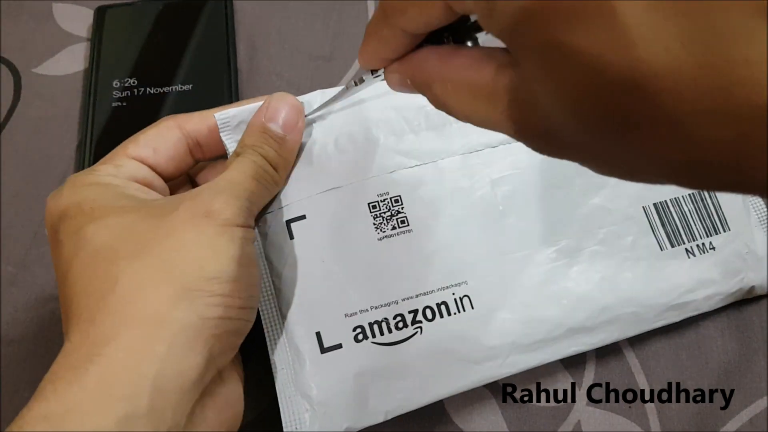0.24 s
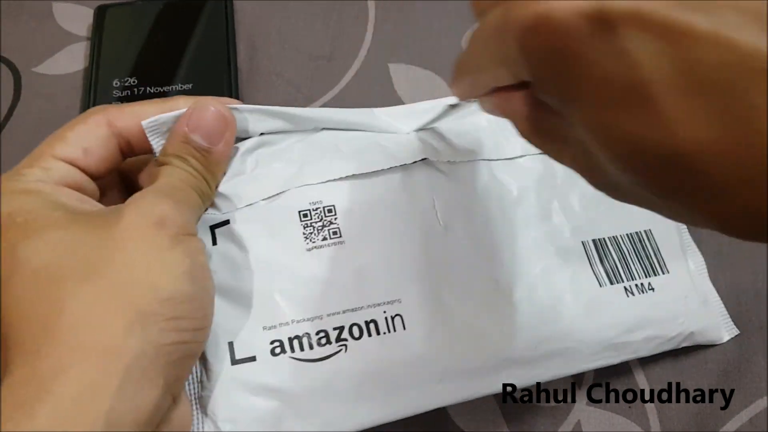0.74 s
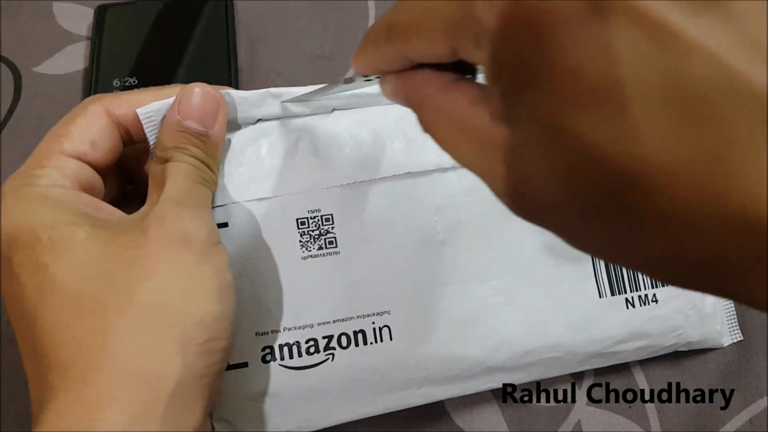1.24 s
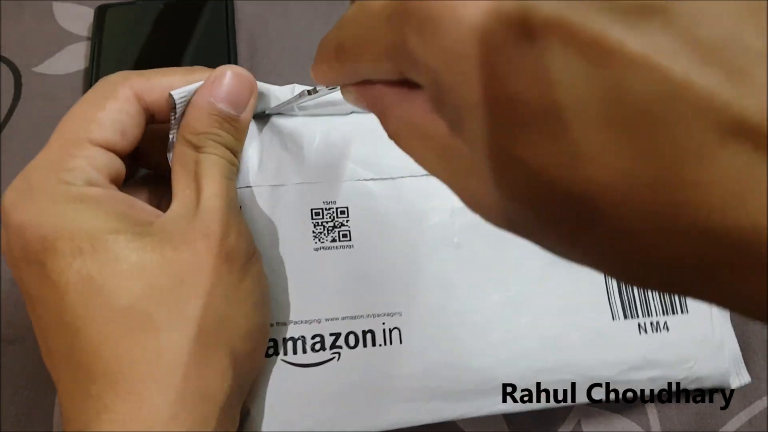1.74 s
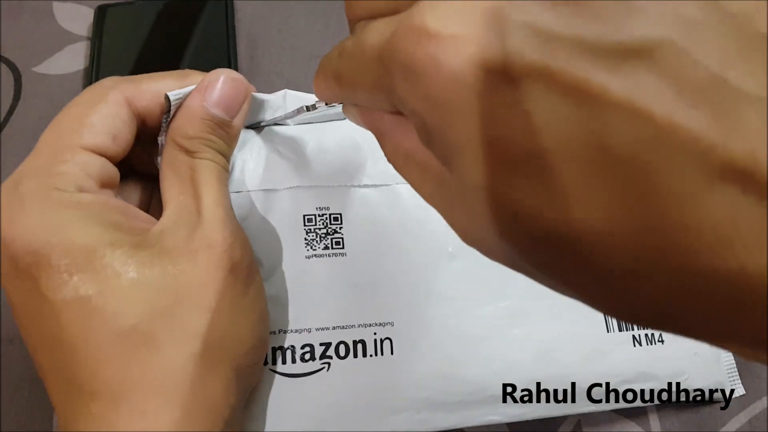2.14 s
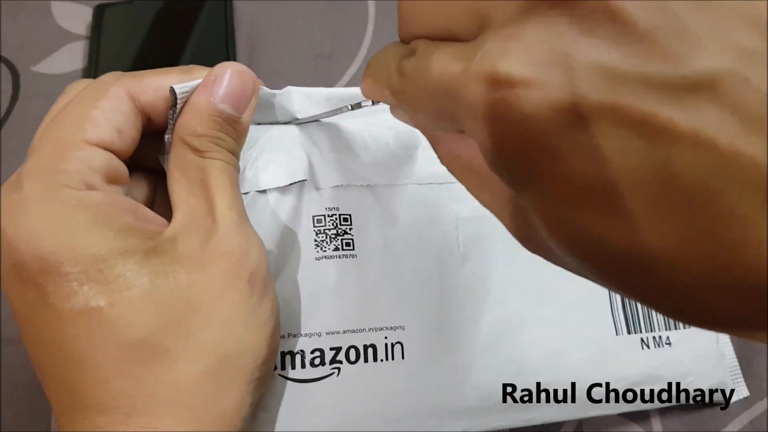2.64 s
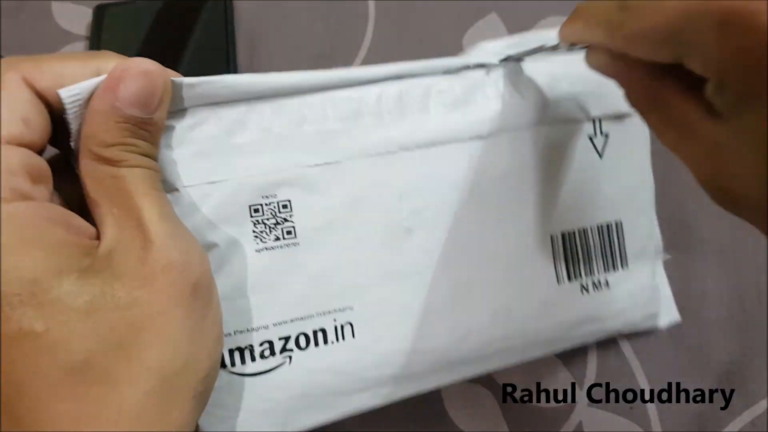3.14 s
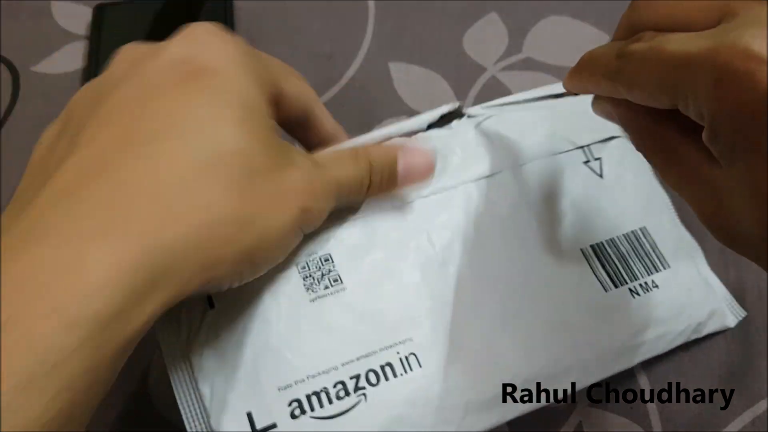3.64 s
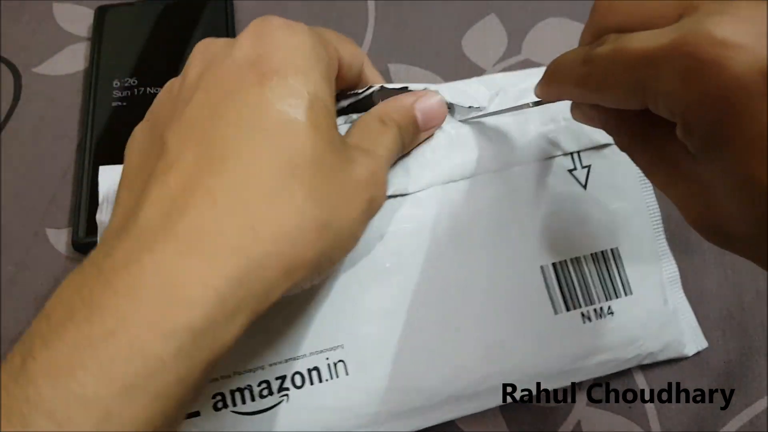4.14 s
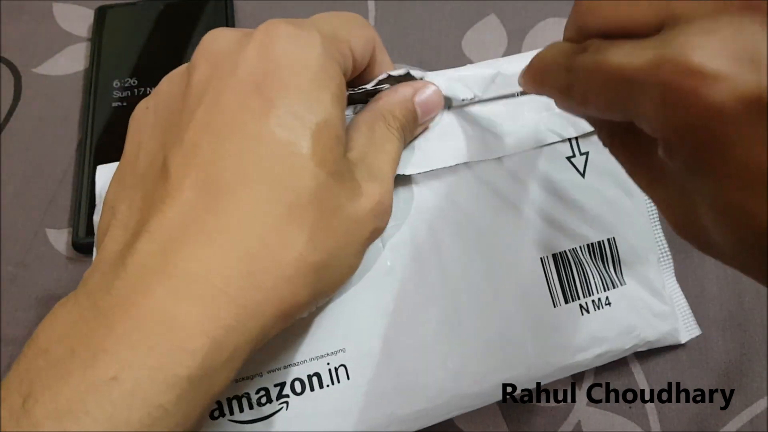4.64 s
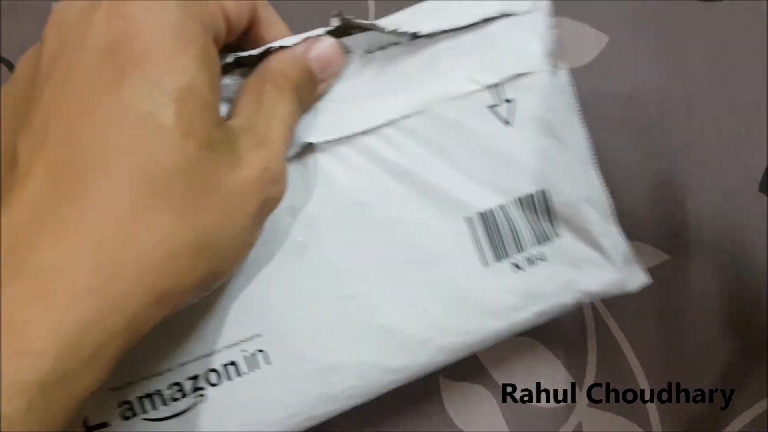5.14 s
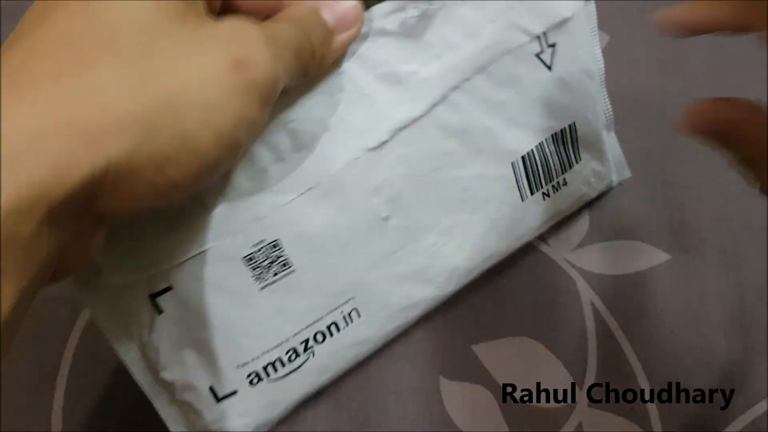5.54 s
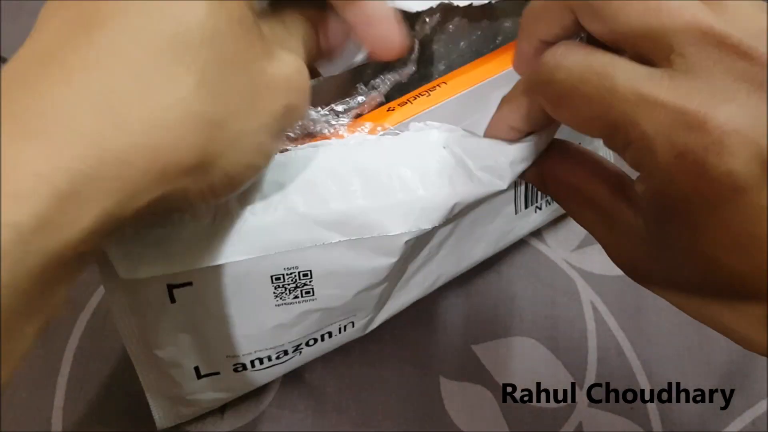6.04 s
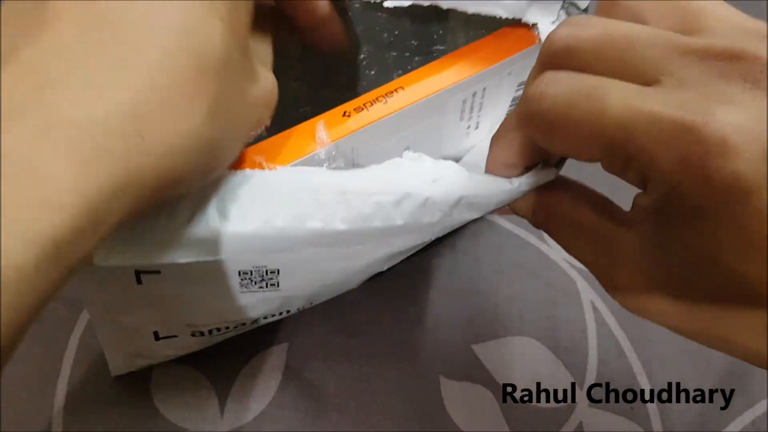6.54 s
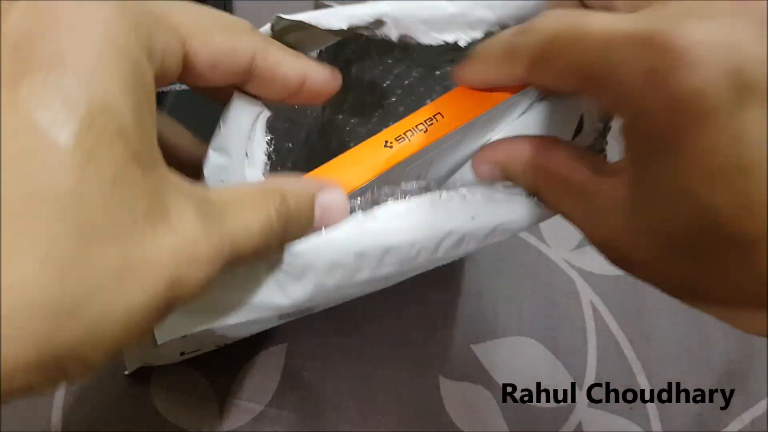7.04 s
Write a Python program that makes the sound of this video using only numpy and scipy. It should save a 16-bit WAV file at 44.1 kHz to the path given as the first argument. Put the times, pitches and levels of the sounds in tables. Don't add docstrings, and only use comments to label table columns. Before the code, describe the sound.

Very close to the microphone in a small furnished room, fingers rustle a padded plastic mailer while a knife works in with small dry snaps and bright ticks. A sudden loud cluster of cracks marks a long cut, followed by quieter regripping. A second quick, hollow rip bursts out, then the opened pouch crinkles and pops with soft low bumps on bedding. A faint machine hums through the wall.

```python
import sys
import numpy as np
from scipy import signal
from scipy.fft import rfft, irfft, next_fast_len
from scipy.io import wavfile
from scipy.ndimage import uniform_filter1d, map_coordinates

SR = 44100
rng = np.random.default_rng(int(sys.argv[2]) if len(sys.argv) > 2 else 0)


def decibels_to_gain(level_db):
    exponent = np.asarray(level_db, float) / 20
    return 10 ** exponent


def int16_out(signal):
    q = np.round(np.clip(np.atleast_2d(signal).T, -1, 1) * 32767)
    wavfile.write(sys.argv[1], SR, q.astype(np.int16))


N = 321930
LEAD = 128
PORT_LAG = 5
OPEN_S = 5.2


def unit(x):
    return x / np.sqrt(np.mean(x ** 2) + 1e-20)


def along(points, hz):
    point_hz, value = np.transpose(points)
    return np.interp(np.log(hz + 1), np.log(point_hz + 1), value)


def curves(rows):
    s, *columns = np.transpose(rows)
    return [np.interp(np.arange(N) / SR, s, column) for column in columns]


def wobble(rate):
    knots = rng.standard_normal(int(N * rate / SR) + 4)
    return map_coordinates(knots, [np.arange(N) * rate / SR])


def filtered(x, response):
    size = next_fast_len(x.shape[-1] + 8192)
    spectrum = rfft(x, size) * response(np.fft.rfftfreq(size, 1 / SR))
    return irfft(spectrum, size)[..., :x.shape[-1]]


# (frequency [Hz], likeness [-1 to 1])
LIKENESS = [(100, 0.94), (700, 0.75), (2000, 0.56), (6000, 0.029), (14000, 0.034)]


def rush(spectrum):
    def mid_side(hz):
        turn = np.arccos(np.clip(along(LIKENESS, hz), -1, 1)) / 2
        return decibels_to_gain(along(spectrum, hz)) * [np.cos(turn), np.sin(turn)]

    mid, side = filtered(rng.standard_normal((2, N)), mid_side)
    return unit(np.array([mid + side, mid - side]))


def place(seconds, shapes, lag):
    at = np.round(seconds * SR).astype(int)[:, None] + np.arange(shapes.shape[2])
    ports = []
    for shape, late in zip(shapes, (0, lag)):
        track = np.bincount((at + late).ravel(), shape.ravel(), N + SR)
        ports.append(track[LEAD:N + LEAD])
    return np.array(ports)


def burst(spectrum, focus_hz, focus_db, rise, t60, core, unlike, size):
    t, hz = (np.arange(size) - LEAD) / SR, np.fft.rfftfreq(size, 1 / SR)
    draw = rng.standard_normal((len(focus_hz), 3 * size + 1))
    common, left, right = np.moveaxis(draw[:, 1:].reshape(-1, 3, size), 1, 0)
    life = np.where(t < 0, -rise, t60) * decibels_to_gain(1.2 * draw[:, :1])
    creep = .14 * decibels_to_gain(-15 * t / life)
    envelope = decibels_to_gain(-60 * t / life) + creep
    slip = (common + unlike * np.array([left, right])) * envelope
    slip[..., LEAD] += core
    focus = np.exp(-(np.log((hz + 1) / focus_hz) / 0.37) ** 2)
    colour_db = along(spectrum, hz) + focus_db * focus
    rows = irfft(rfft(slip) * decibels_to_gain(colour_db), size)
    return rows / np.abs(rows).max(axis=(0, 2), keepdims=True)


# (pitch [Hz], start [s], loudest [s], stop [s], loudest level [dB])
MACHINE_RUNS = [
    (91.5, -.3, .1, .55, -55),
    (91.5, 1.54, 1.6, 1.95, -52),
    (91.5, 1.98, 2.25, 2.5, -47),
    (91.5, 3.55, 4.7, 4.9, -53),
    (91.5, 5.1, 5.9, 6.6, -58),
    (33, -.1, .25, .6, -55),
    (33, 3.85, 4.1, 4.8, -59.5),
    (169, 5.08, 5.3, 5.56, -53),
    (169, 5.93, 6.02, 6.35, -54),
]


def hum(hz, level_db, drift):
    turns = np.cumsum(hz * (1 + drift * wobble(3.59))) / SR
    return np.sqrt(2) * decibels_to_gain(level_db) * np.sin(2 * np.pi * turns)


def machine():
    fade_s, drift_hz = .16, 1.3
    t = np.arange(N) / SR
    tones = np.zeros(N)
    for hz in sorted({row[0] for row in MACHINE_RUNS}):
        levels = []
        for pitch, start, loudest, stop, db in MACHINE_RUNS:
            if pitch == hz:
                times = [start - fade_s, start, loudest, stop, stop + fade_s]
                levels.append(db + np.interp(t, times, [-25, -5, 0, -5, -25]))
        tones += hum(hz, np.max(levels, axis=0) + 1.25 * wobble(11), drift_hz / hz)
    return np.array([tones, np.roll(tones, 5 * PORT_LAG)]) * decibels_to_gain([[-.7], [.7]])


# (time [s], hold [s], rustle level [dB], fizz rel. to rustle [dB])
GRIPS = [(0, 0.052, -58.5, -4.5), (0.228, 0.035, -60.5, -16), (0.38, 0.08, -60, -8.5),
         (0.667, 0.0079, -46, 5.5), (0.76, 0.042, -55, -2), (0.924, 0.033, -51, -3),
         (1.3, 0.015, -60.5, -9), (1.388, 0.2, -55, -3.5), (1.623, 0.14, -62.5, 5), (1.817, 0.24, -62, -1),
         (2.108, 0.38, -68.5, -3.5), (2.518, 0.17, -58.5, -6), (3.18, 0.23, -62.5, 3.5),
         (3.737, 0.043, -54, -4), (3.845, 0.23, -55, -3.5), (4.152, 0.095, -57, 0), (4.322, 0.14, -61.5, 1),
         (4.553, 0.0081, -59.5, 0), (4.713, 0.1, -57.5, -0.5)]
# (time [s], hold [s], rustle level [dB], fizz rel. to rustle [dB])
STROKES = [
    (2.655, 0.0091, -59, 3),
    (2.8, 0.015, -29, 0),
    (2.999, 0.06, -37, 6),
    (4.861, .01, -37, 1),
    (4.905, 0.017, -29, 7.5),
]
# (time [s], hold [s], rustle level [dB], fizz rel. to rustle [dB])
PULLS = [(5.216, 0.19, -51, -4.5), (5.45, 0.17, -54.5, -6.5), (5.707, 0.099, -54, -4),
         (5.86, 0.0088, -48, 4), (5.982, 0.0085, -49.5, 11), (6.148, 0.014, -55, 7),
         (6.328, 0.071, -49.5, 4), (6.508, 0.011, -45, 9), (6.697, 0.019, -54.5, 10),
         (6.852, 0.17, -60.5, 5), (6.996, 0.056, -57.5, 5), (7.077, 0.16, -63.5, 13.5),
         (7.262, 0.015, -56, 7)]


def effort():
    rest_rustle_db, rest_fizz_db = -67.5, -71
    rustle_fall, fizz_fall = 123, 173
    s, hold, db, fizz_db = np.transpose([*STROKES, *GRIPS, *PULLS])[:, :, None]
    blade = np.arange(len(s))[:, None] < len(STROKES)
    rise = np.where(blade, 910, 264)
    t = np.arange(0, N + 64, 64) / SR
    before = np.maximum(s - t, 0)
    after = np.maximum(t - s - hold, 0) * np.where(blade, 1.07, 1)
    rustle = decibels_to_gain(2 * (db - rise * before - rustle_fall * after)).sum(axis=0)
    fizz = decibels_to_gain(2 * (db + fizz_db - rise * before - fizz_fall * after)).sum(axis=0)
    rustle_db = 10 * np.log10(decibels_to_gain(2 * rest_rustle_db) + rustle)
    total_fizz_db = 10 * np.log10(decibels_to_gain(2 * rest_fizz_db) + fizz)
    return curves(np.transpose([t, rustle_db, total_fizz_db]))


# (frequency [Hz], level [dB per Hz])
RUMBLE = [(12, -30), (20, -20), (43, -5.5), (103, 1.5), (173, -0.5), (443, -14.5), (500, -9), (650, -37),
          (1100, -120)]


def bedding():
    lifted = np.arange(N) / SR > OPEN_S
    pressing_db = uniform_filter1d(effort()[0], int(0.028 * SR)) + 57
    level_db = -58 + 3 * lifted + 0.36 * pressing_db + 2.62 * wobble(25)
    return decibels_to_gain(level_db) * rush(RUMBLE)


def crinkle(level_db, spectrum, low_hz, high_hz, t60, spread_db, count):
    draw = rng.random((count, 4))
    size = decibels_to_gain(-spread_db * np.log(draw[:, 1:2] + 0.066))
    sides = decibels_to_gain(12.0 * (draw[:, 2:3] - .5) * np.array([1, -1])[:, None, None])
    pitch_hz = low_hz * (high_hz / low_hz) ** draw[:, 3:]
    shapes = burst(spectrum, pitch_hz, 9.2, rise=0.014, t60=t60, core=4.9, unlike=1.0, size=384)
    grains = place(draw[:, 0] * N / SR, sides * size * shapes, PORT_LAG)
    return decibels_to_gain(level_db) * unit(grains)


# (frequency [Hz], level [dB per Hz])
RUSTLE = [(150, -39), (260, 4.5), (450, -7), (760, -0.5), (1050, -7), (1400, -7), (1900, -6.5),
          (2500, -7.5), (3800, -14), (6000, -23.5), (9000, -44)]
# (frequency [Hz], level [dB per Hz])
FIZZ = [(1500, -6.5), (3500, -2.5), (7000, -5), (15000, -5), (17000, -11)]


def mouth(x):
    width_hz = 220

    def resonances(hz):
        return sum(1j * hz * width_hz / (centre ** 2 - hz ** 2 + 1j * hz * width_hz)
                   for centre in (1400, 2350))

    return decibels_to_gain(2) * filtered(x, resonances)


def handling():
    rustle_db, fizz_db = effort()
    slit = np.arange(N) > OPEN_S * SR
    tremor = 1.5 * wobble(60)
    rustle = decibels_to_gain(np.minimum(rustle_db - 6 + 3 * slit, -47) + tremor) * rush(RUSTLE)
    fizz = decibels_to_gain(np.minimum(fizz_db - 1.5, -49) + tremor) * rush(FIZZ)
    dull_db = np.minimum(rustle_db - 4 * slit, -41) + tremor
    dull = crinkle(dull_db, RUSTLE, low_hz=660, high_hz=4200, t60=0.011, spread_db=3.8, count=3000)
    bright_db = fizz_db - 9 - 4 * slit
    bright = crinkle(bright_db, FIZZ, low_hz=3870, high_hz=14200, t60=0.009, spread_db=2.5, count=2200)
    low = rustle + dull
    low = low + mouth(low) * slit
    return decibels_to_gain([[.6], [-.6]]) * low + decibels_to_gain([[1.5], [-1.5]]) * (fizz + bright)


# (time [s], left over right level [dB])
BLADE_PAN = [(0, 4), (2.8, 4.5), (3.4, 5), (3.7, 1.5), (4.5, 4), (4.6, 4.5), (5.3, 3.5), (7.3, 3.5)]


def slips(rows, spectrum, level_db, focus_db, t60):
    s, db, hz = np.transpose(rows)[:, :, None]
    pan_db = np.interp(s, *np.transpose(BLADE_PAN))
    sides_db = np.array([pan_db, -pan_db]) / 2
    shapes = burst(spectrum, hz, focus_db, rise=.003, t60=t60, core=4, unlike=.6, size=512)
    give_s = .0014
    return place(s[:, 0] + give_s, decibels_to_gain(db + level_db + sides_db) * shapes, PORT_LAG)


# (frequency [Hz], level [dB per Hz])
POUCH_WALL = [(300, -42), (700, -3.5), (3000, -7), (6000, -7.5), (10000, -21)]
# (time [s], peak level [dB], pitch [Hz])
DIMPLES = [(0.009, -38.5, 1170), (0.027, -39, 1480), (0.04, -44, 1240), (0.387, -37, 1010),
           (0.424, -45, 1120), (0.651, -32, 1300), (0.664, -25, 1070), (0.686, -31, 1260),
           (0.698, -36, 1020), (0.73, -29, 1470), (0.783, -38, 802), (0.846, -45, 802), (0.858, -43, 829),
           (0.898, -37, 805), (0.914, -41, 816), (0.924, -35, 1750), (1.285, -39, 1090), (1.366, -40, 802),
           (1.399, -39.5, 851), (1.471, -50, 1720), (1.492, -41, 1840), (1.701, -37, 845),
           (1.729, -35.5, 860), (1.81, -43, 1950), (1.837, -38.5, 2050), (1.865, -40, 1100),
           (1.955, -39.5, 1010), (2.006, -45.5, 1140), (2.045, -58, 826), (2.296, -44.5, 802),
           (2.317, -44.5, 1330), (2.614, -41.5, 821), (3.699, -60, 810), (3.758, -39, 1180),
           (3.89, -34, 1300), (4.069, -45, 816), (4.139, -38, 848), (4.267, -38, 1880), (4.339, -39, 1750),
           (4.356, -39, 1910), (4.374, -37, 1830), (4.607, -48, 821), (4.918, -29, 1200), (4.924, -17, 894),
           (5.284, -40, 1430), (5.619, -52, 1870), (5.674, -39, 1320), (5.707, -42, 2330),
           (5.784, -29.5, 2480), (5.874, -27, 1820), (5.956, -26, 1890), (5.999, -44, 1410),
           (6.04, -32.5, 1330), (6.242, -39, 1350), (6.361, -33, 1190), (6.636, -36.5, 802),
           (6.777, -37.5, 1490), (6.853, -40.5, 1310), (6.975, -38, 1730), (7.019, -35, 888)]


def dimples():
    return slips(DIMPLES, POUCH_WALL, 0.39, 12.0, t60=0.014)


# (time [s], peak level [dB], pitch [Hz])
TICKS = [(0.0144, -52, 7380), (0.0463, -38, 11000), (0.4015, -43, 9790), (0.4194, -46, 5320),
         (0.4883, -46, 9130), (0.5072, -48, 9250), (0.5756, -45, 6570), (0.5985, -29.5, 8420),
         (0.699, -37, 5010), (0.8274, -49, 9300), (0.8515, -37, 5090), (0.9822, -31, 13700),
         (0.9994, -38, 6450), (1.0326, -38, 5130), (1.4925, -37, 5690), (1.515, -34, 7970),
         (1.5894, -33, 8550), (1.595, -34, 8590), (1.6726, -37, 5460), (1.7404, -43, 6070),
         (2.1291, -45, 8840), (2.1675, -51, 11500), (2.1804, -48, 8910), (2.1874, -44, 10500),
         (2.2518, -41.5, 5330), (2.3526, -53, 5340), (2.3735, -45, 9070), (2.429, -35, 7100),
         (2.5186, -28, 9000), (2.637, -26, 8730), (2.8265, -3.5, 13100), (3.8072, -39, 6220),
         (4.037, -40, 5020), (4.0602, -38, 6240), (4.182, -39, 11000), (4.233, -36, 11700),
         (4.3301, -40, 9420), (4.5276, -51, 6740), (4.5946, -31, 9180), (4.9436, -12, 5530),
         (5.1774, -41, 5630), (5.199, -42, 8300), (5.217, -37, 8110), (5.3443, -36, 11000),
         (5.3574, -35, 7570), (5.3864, -38, 12000), (5.5478, -39, 9120), (5.7843, -38, 5530),
         (5.9275, -26, 5350), (6.0004, -30, 8650), (6.013, -31, 8930), (6.0407, -45, 6710),
         (6.0681, -33, 11000), (6.1489, -36, 12700), (6.1784, -26, 5370), (6.3698, -24, 5510),
         (6.5061, -39, 8300), (6.5514, -33, 7250), (6.5894, -34, 6000), (6.6837, -30, 10400)]


def ticks():
    return slips(TICKS, FIZZ, -0.68, 9.5, t60=0.007)


# (time [s], peak level [dB], pitch [Hz])
CREASES = [(0.055, -40, 1880), (0.0644, -44, 1750), (0.632, -37, 1710), (0.7174, -41, 1390),
           (0.944, -38, 1840), (0.9614, -42, 1640), (1.3987, -38, 2360), (1.4341, -38, 1870),
           (1.4711, -41, 1790), (1.5304, -38, 1820), (3.3408, -49, 1820), (3.3667, -39.5, 2420),
           (3.6217, -44.5, 1230), (3.7844, -35, 1350), (3.9155, -39, 1270), (5.2244, -34, 1270),
           (5.2994, -44, 1400), (5.393, -33, 1300), (5.8894, -33, 2280), (5.9147, -28.5, 2160),
           (6.025, -46, 2310), (6.5245, -29, 1270), (6.552, -33, 1810), (6.7265, -38, 3960),
           (6.9814, -40, 1730), (7.0784, -45, 1720), (7.1806, -38, 4310), (7.207, -35, 1840),
           (7.2646, -34, 1360), (7.2784, -34, 1820)]


def creases():
    return slips(CREASES, POUCH_WALL, -2.0, 18, t60=0.017)


# (frequency [Hz], level [dB], decay [cycles])
POUCH_MODES = [(259, -1, 4.6), (380, -8.5, 10.5), (588, -0.5, 9.5), (735, 8, 10.9), (1084, -0.5, 10)]


def pouch_ring(count, scatter, spread_db, size):
    t = np.maximum(np.arange(size) - LEAD + 20, 0) / SR
    mode_hz, db, cycles = np.transpose(POUCH_MODES)[:, :, None]
    draw = rng.standard_normal((count, len(POUCH_MODES), 3))
    hz = mode_hz * np.exp(scatter * draw[..., :1])
    level_db = db + spread_db * draw[..., 1:2] - 60 * t * hz / cycles
    modes = decibels_to_gain(level_db) * np.sin(2 * np.pi * hz * t)
    rows = modes.sum(axis=1) * (1 - np.exp(-t / 0.00039))
    return rows / np.abs(rows).max(axis=1, keepdims=True)


# (time [s], crack peak level [dB], pouch rel. to crack [dB], fizz rel. to crack [dB])
PRYING = [(0.0719, -36.5, -17, -21), (0.2103, -19.5, -2, -13), (0.3684, -39.5, -9, -5),
          (0.4651, -30, -18, -24), (0.5536, -39, -31, 10.5), (0.6046, -36, -5, -5), (0.6297, -32.5, -4, -6),
          (0.6593, -32.5, 0, 1), (0.6712, -24, -11, -30), (0.7268, -26.5, -20, 0.5),
          (0.7445, -27.5, -8, -6.5), (0.7761, -32.5, -25, -2.5), (0.871, -35.5, -14, -5),
          (1.0132, -45, -19, 9), (1.0867, -39, -10, -6.5), (1.3498, -40, -13, 2), (1.4356, -33.5, -8, -5.5),
          (1.5446, -37.5, 7.5, -6), (1.5504, -30.5, -14, -16), (1.5829, -32.5, -1.5, -10),
          (1.6629, -32, -4, -13), (1.7176, -32.5, -10, -7.5), (1.7963, -42, -18, -1.5),
          (1.883, -35, -9, -10), (2.0953, -40.5, -15, -10), (2.3829, -38, -22, -13),
          (2.4158, -30.5, -17, 6.5), (2.4694, -38, -14, -1), (2.4912, -32.5, -15, 4), (2.5225, -27, -12, 0)]
CUT = [(2.6422, -32, -9, -7), (2.6443, -23.5, -2, -16), (2.6592, -27, -6, -8), (2.662, -20.5, -3.5, 4),
       (2.684, -37, -20, 4), (2.7089, -25, -12, -3), (2.7422, -33, -5, 2), (2.775, -36, 0, 0),
       (2.786, -18, -4, -13), (2.788, -23, -1, 6), (2.7917, -19.5, -6, 2.5), (2.794, -20.5, -2, -1),
       (2.801, -19.5, -12, 6), (2.8146, -17, -8, -5), (2.8193, -16, 1.5, -5), (2.826, -21, -5, -3),
       (2.837, -18.5, 4, -6), (2.84, -21.5, -5, 1), (2.9693, -29.5, 4, 1), (2.972, -21, 3, -8),
       (2.9806, -26.5, -4, 3), (2.9977, -16, -7, 1), (3.0026, -14, -9, -13), (3.0245, -7.5, -3.5, -9),
       (3.0314, -14.5, -7, -4), (3.0347, -20, 1, -3), (3.0768, -12, -9, -2.5), (3.0781, -12.5, 0.5, -5.5)]
REGRIP = [(3.2822, -39.5, -5, -11), (3.3937, -41.5, -1, 3), (3.4321, -36.5, -10, -16),
          (3.5663, -39.5, -9, -16), (3.722, -38, -11, -8), (3.7928, -40, -4, -5), (3.8564, -26.5, -5, -12),
          (3.9539, -37, -13, -0.5), (4.0496, -35, -10, -17), (4.1519, -35, -4, -3),
          (4.196, -28.5, -12, -19), (4.285, -33.5, -36, -15), (4.42, -34.5, -26, -19),
          (4.543, -29.5, -7, -34), (4.581, -34.5, -2, -5), (4.591, -23, -2.5, -3), (4.701, -32, -4, -27),
          (4.728, -36, -11, -20)]
RIP = [(4.8466, -18, -3, -2), (4.861, -16, 5.5, -2.5), (4.872, -24, 5, 6.5), (4.884, -15, -3, -2.5),
       (4.8917, -19, 3.5, -6), (4.8944, -7, -9, -2), (4.9012, -13.5, -0.5, -11), (4.9087, -14.5, 2.5, -7),
       (4.9168, -11.5, -5, -16), (4.92, -25, 9, -16), (4.9245, -28, -15.5, -13), (4.925, -21.5, -8, 3),
       (4.934, -19, 5, -1), (4.938, -20, -1, -8), (4.9507, -28, -11, 7), (4.9621, -27, -19, 2),
       (4.9666, -15, -2.5, 5), (4.9806, -22, 7.5, -17), (4.985, -22.5, 8, 3.5)]
SPREAD = [(5.254, -43, -4, -16), (5.368, -47, 15, -2), (5.5572, -43, 2, -15), (5.7279, -41, 8, 1),
          (5.7755, -37, -7, -3), (5.7919, -35, 2, -3), (5.8484, -34, 6, -13), (5.871, -35, -12, 0),
          (5.9348, -25.5, -10, -9), (5.9872, -18.5, -9.5, -20), (6.0025, -29, -20, -2),
          (6.0363, -33, -22, -9), (6.2618, -32, -11, 1), (6.2986, -32.5, -8, -15), (6.3206, -29.5, -13, -8),
          (6.3745, -22, -13, 2.5), (6.3764, -20, -6, -4.5), (6.3927, -34, 2, 13), (6.4054, -15, -10.5, -22),
          (6.473, -28, -16, -20), (6.5058, -24.5, -34, -4), (6.5264, -32.5, -12, 4), (6.5806, -30, -9, -21),
          (6.7591, -31.5, -8, -8), (7.072, -33.5, -23, -18), (7.138, -49, -25, 9), (7.2027, -35, -9, -2),
          (7.273, -21.5, -12.5, -19.5)]
# (frequency [Hz], level [dB per Hz])
CRACK = [(500, -34), (1100, 6.5), (1600, 2.5), (2400, 5), (4500, 3), (7000, -25.5), (9000, -49)]
# (frequency [Hz], level [dB per Hz])
SPARK = [(3000, -1), (5000, 13), (8000, 7.5), (12000, 7), (15500, 4), (16600, -15), (17000, -45)]
# (time [s], lag [samples])
BLADE_LAG = [
    (4.7, 5),
    (4.8, 0),
    (5.4, 1),
    (6, 4),
]


def snaps():
    s, db, pouch_db, fizz_db = np.transpose([*PRYING, *CUT, *REGRIP, *RIP, *SPREAD])[:, :, None]
    crack_hz = 3300 * np.exp(0.042 * fizz_db)
    crack = burst(CRACK, crack_hz, 5, rise=.002, t60=.005, core=11, unlike=.7, size=768)
    crack = decibels_to_gain(db + 2) * crack
    spark = burst(SPARK, 3 * crack_hz, 2, rise=.002, t60=.004, core=9, unlike=1.2, size=768)
    spark = decibels_to_gain(db + fizz_db + 7.5) * spark
    ring = decibels_to_gain(db + pouch_db - 1.5) * pouch_ring(len(s), scatter=0.078, spread_db=3.0, size=1536)
    pan_db = np.interp(s, *np.transpose(BLADE_PAN)) + 2.5 * rng.standard_normal(s.shape)
    sides = decibels_to_gain(np.array([pan_db, -pan_db]) / 2)
    lag = np.round(np.interp(s, *np.transpose(BLADE_LAG))).astype(int)
    sharp = place(s[:, 0], sides * crack + sides ** 2.05 * spark, lag)
    hollow = place(s[:, 0], sides ** 0.11 * ring, lag)
    return sharp + hollow


# (frequency [Hz], t60 [s])
ROOM_DECAY = [(200, 0.13), (600, 0.58), (1500, 0.15), (4000, 0.29), (10000, 0.19)]
# (frequency [Hz], level [dB])
FURNISHINGS = [(760, -3), (1700, 2), (5000, -6.5), (12000, -3), (17000, -14)]


def room(x):
    x = filtered(x, lambda hz: decibels_to_gain(along(FURNISHINGS, hz)))
    out, step = np.zeros((2, N + SR)), SR // 20
    hz, t, z = signal.stft(rng.standard_normal((8, 2, SR // 2)), SR, nperseg=256)
    decay = decibels_to_gain(-60 * t / along(ROOM_DECAY, hz)[:, None])
    tails = signal.istft(z * decay, SR, nperseg=256)[1]
    turn = np.arange(N) // step % len(tails)
    for k, tail in enumerate(tails):
        wet = signal.fftconvolve(x * (turn == k), tail / np.linalg.norm(tail[0]), axes=1)
        out[:, 130:130 + wet.shape[1]] += wet
    return out[:, :N]


# (time [s], peak level [dB], pitch [Hz], t60 [s])
BUMPS = [(5.318, -46.5, 188, 0.14), (5.495, -35.5, 83, 0.18), (5.497, -40, 55, 0.086),
         (5.498, -39, 126, 0.059), (5.666, -46.5, 84, 0.071), (5.712, -45.5, 296, 0.033),
         (5.851, -45.5, 230, 0.046), (5.99, -46, 410, .04), (6.072, -42, 220, 0.037),
         (6.362, -40.5, 193, 0.033), (6.536, -54, 302, 0.051), (6.669, -48, 198, 0.048),
         (7.033, -49.5, 231, 0.051)]


def bumps():
    s, db, hz, t60 = np.transpose(BUMPS)[:, :, None]
    t = np.arange(SR // 4) / SR
    swell = (1 - np.exp(-12 * t / t60)) ** 2
    thud = decibels_to_gain(db + 16.0 - 60 * t / t60) * swell * np.sin(2 * np.pi * hz * t)
    return place(s[:, 0], np.array([thud, thud]), PORT_LAG)


def scene():
    def lean_bass(hz):
        return (1j * hz / (116 + 1j * hz)) ** 2

    film = filtered(-snaps(), lean_bass)
    faint = machine() + bedding() + handling()
    faint = faint + dimples() + ticks() + creases()
    faint = faint + decibels_to_gain(-8.5) * room(film) + bumps()
    return film + filtered(faint, lambda hz: hz < 15850)


def band_limit(x):
    return signal.sosfilt(signal.butter(12, 16970, fs=SR, output="sos"), x)


def record(dry):
    soft = dry / (1 + np.abs(dry / .85) ** 4) ** .25
    mix = filtered(soft, lambda hz: hz < 16950)
    return band_limit(mix)


dry = scene()
out = record(dry)
int16_out(out)
```